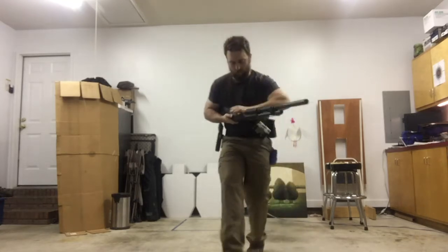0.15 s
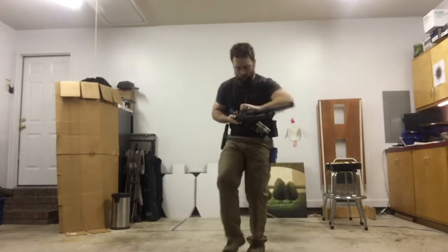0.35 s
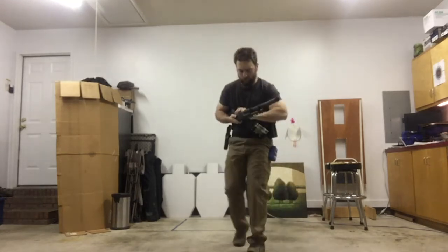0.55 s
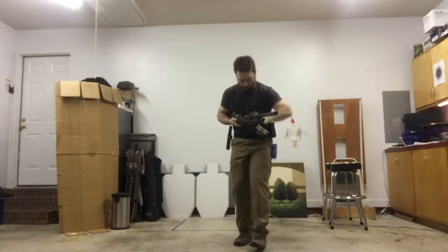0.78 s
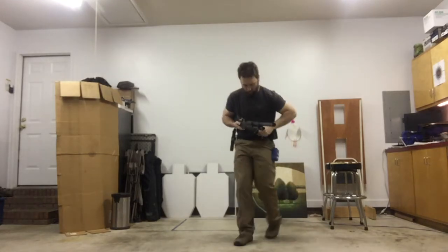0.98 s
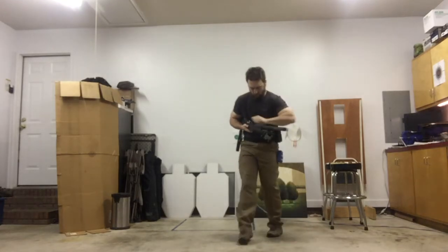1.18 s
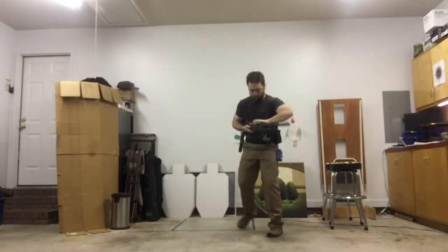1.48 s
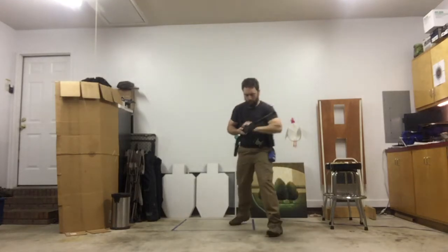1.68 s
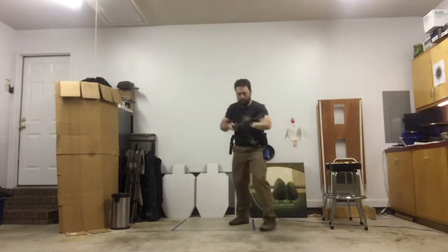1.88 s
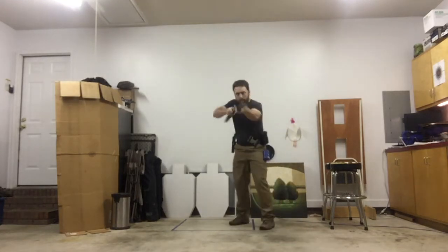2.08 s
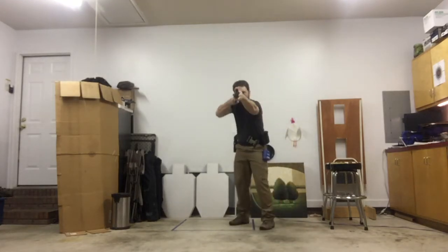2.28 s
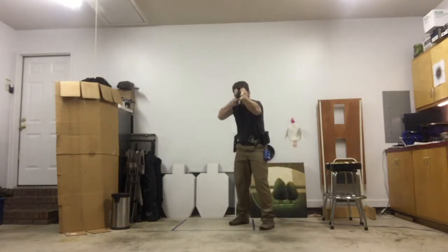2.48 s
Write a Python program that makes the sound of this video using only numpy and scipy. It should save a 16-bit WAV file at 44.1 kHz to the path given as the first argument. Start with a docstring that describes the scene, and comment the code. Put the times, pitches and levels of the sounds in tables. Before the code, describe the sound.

Distant shotgun loading: clacking metal, scraping shells and soft footsteps in a hard-walled garage

```python
"""Shells are thumbed into a shotgun by a man stepping about a hard-walled garage, who then shoulders it.
Each push is a run of steel clicks (noise bursts and faint ringing modes) over scraping hulls (random slips).
Small parts squeak; cloth rustles and soft low thuds of steps and gun lie beneath, over steady room tone.
The microphone stands at a distance and hears mostly the room: weak direct sound, first echoes, dense tails.
Both channels carry the same mono sound."""
import sys
import numpy as np
from scipy import signal
from scipy.fft import rfft, irfft
from scipy.io import wavfile

SR = 44100
rng = np.random.default_rng(int(sys.argv[2]) if len(sys.argv) > 2 else 0)


def int16_out(signal):
    """Quantize to a 16-bit WAV file."""
    q = np.round(np.clip(np.atleast_2d(signal).T, -1, 1) * 32767)
    wavfile.write(sys.argv[1], SR, q.astype(np.int16))


N = 116865

# Shells, latch and gear knocking. Levels are before the room; body and treble are shelf gains:
# (time [s], level [dB], body [dB], treble [dB], direct sound relative to the room send [dB])
CLICKS = [ (0.170, -39.5, -26, -8, 1), (0.196, -42.5, 0, -11, 6), (0.244, -39.5, 16, 0.5, 0.5),
          (0.295, -27.5, -18, -4.5, -5), (0.319, -25, -5.5, -16, 10.5), (0.361, -32, -4.5, -9, 8.5),
          (0.500, -45.5, 9, 10, 7), (0.513, -37, 3, -24, 6), (0.613, -46.5, 16, 3, -2),
          (0.694, -29, 6, 2, -5), (0.707, -31, 2, 2, 0.5), (0.737, -35, -4, 9, 2.5),
          (0.744, -35.5, 2.5, -2.5, 8.5), (0.788, -34, 3, -9, 6), (1.127, -52, -9, -7, 9),
          (1.154, -52, -39, 4, 12.5), (1.162, -51.5, 17, -6, 4), (1.311, -62, -2, 0, 10),
          (1.394, -64, -8, 7, 3), (1.4, -46.5, -33, 0, 4), (1.409, -43, 15, 2.5, -4),
          (1.455, -32, -0.5, -15, 9.5), (1.463, -30.5, -9, -19, 5), (1.509, -32.5, -2.5, 2.5, 4.5),
          (1.516, -31, 0, -7, 10), (1.776, -39, 11.5, 6, 1.5), (1.783, -46.5, 11, 13.5, 10.5),
          (1.849, -37, 7.5, 6, 6.5), (1.867, -32, 3, -10, 6), (1.921, -29.5, -3.5, -6.5, 1),
          (2.164, -53, 10, -23, 16), (2.171, -40.5, 12, -8.5, -2), (2.355, -64, 14, -30, 25),
          (2.367, -41.5, -3, -12.5, 1)]
# Hulls and hands sliding on the gun: (time [s], length [s], level [dB], body [dB], treble [dB])
SLIDES = [ (0.0, 0.0089, -41, 11, 3), (0.250, 0.049, -49.5, 0, 9.5), (0.305, 0.0618, -30.5, 1, 3),
          (0.37, .04, -47.5, 25.5, -15), (0.49, 0.077, -39.5, 3.5, -23), (0.61, 0.077, -46, 2, -0.5),
          (0.707, 0.082, -30, 2.5, -17.5), (0.80, 0.061, -53, 19.5, -15), (1.06, 0.085, -55, 13.5, -3),
          (1.442, 0.044, -30, 3, -1), (1.50, 0.11, -37.5, 7.5, 0), (1.66, .07, -57, 6, -14),
          (1.775, 0.019, -32, 2.5, -14), (1.852, .11, -36, 3.5, 5.5), (1.96, 0.087, -37.5, 6.5, -23),
          (2.175, 0.023, -48.5, -10, -5)]
# Small parts that sing briefly when rubbed or flicked:
# (time [s], length [s], pitch [Hz], width [Hz], level [dB])
SQUEAKS = [(0.0, 0.0067, 4450, 716, -37), (0.169, 0.0027, 3480, 900, -37), (0.188, .012, 1540, 380, -41),
           (0.242, 0.0046, 3520, 890, -30), (0.249, 0.011, 1450, 220, -42),
           (0.293, 0.015, 1770, 447, -34.5), (0.455, 0.036, 838, 256, -48),
           (0.693, 0.038, 1700, 400, -46.5), (0.72, 0.065, 7230, 497, -41),
           (1.127, 0.0039, 4700, 595, -42.5), (1.16, 0.034, 4630, 800, -54), (1.335, 0.029, 795, 300, -55),
           (1.453, 0.028, 2010, 250, -39), (1.512, 0.0075, 4000, 2600, -30.5),
           (1.912, 0.0095, 3160, 1990, -27), (2.161, .012, 1890, 410, -39),
           (2.161, 0.014, 3540, 1090, -38.5), (2.353, 0.028, 1947, 120, -45)]
# Clothing and sling: (time [s], length [s], level [dB])
RUSTLES = [(0.02, 0.13, -60), (0.14, .05, -51), (1.315, 0.037, -50), (1.41, .03, -46.5), (1.67, 0.079, -52),
           (1.97, 0.037, -41.5), (2.18, 0.044, -45.5), (2.346, 0.032, -44.5), (2.39, 0.13, -57.5)]
# Footfalls and dull bumps of the gun: (time [s], level [dB], centre pitch [Hz])
THUDS = [(0.123, -52, 320), (0.145, -61, 150), (0.27, -63, 330), (0.33, -58.5, 320), (0.395, -59, 185),
         (0.617, -59, 250), (0.80, -59.5, 160), (1.065, -66.5, 290), (1.17, -67.5, 280),
         (1.311, -53.5, 1600), (1.411, -60, 384), (1.47, -59.5, 330), (1.555, -54.5, 280), (1.706, -68, 75),
         (1.786, -54, 380), (1.971, -53.5, 337), (2.0, -55, 274), (2.345, -53, 700), (2.354, -44, 1440)]
# Colour of sound passing through the gun's body: (frequency [Hz], relative level [dB])
GUN_COLOUR = [(90, -63), (200, -30.5), (340, -17.5), (460, -24), (620, -18.5), (960, -13.5), (1400, -9),
              (1900, -2.5), (2700, -1.5), (3150, 1), (3900, .5), (4650, 2.5), (5300, -1), (5900, -6.5),
              (7300, -5), (8300, -6), (9500, -5.5), (10400, -11.5), (14000, -11.5), (16000, -18)]
# Modes of barrel and magazine tube: (frequency [Hz], relative level [dB], time to fall 60 dB [s])
STEEL_MODES = [(1550, -30, .3), (1793, -5, .25), (2700, -8.5, .2), (3090, 43, 0.1), (3195, -18, .3),
               (3250, -16, .25), (3720, -15, .25), (4240, -8, .25), (4840, 0, 0.48), (4662, 7, .25),
               (4940, 9, .2)]
# Colour of rubbed cloth: (frequency [Hz], relative level [dB])
CLOTH_COLOUR = [(100, -28.5), (300, -12.5), (800, 0.5), (1500, 0), (2600, 0), (4500, -1.5), (6500, -16.5),
                (9000, -11), (15000, -34)]
# First echoes off floor, ceiling and walls: (delay [s], level relative to the direct sound [dB])
ECHOES = [(.0052, -7.5), (.0085, -8), (0.0124, -10.5), (0.017, -22.5)]
# Decay of the garage: (frequency [Hz], time to fall 60 dB [s])
GARAGE_DECAY = [(100, 0.26), (250, 0.96), (530, 0.52), (1400, 0.7), (4200, 0.64), (7000, .6), (9500, 0.48),
                (11500, 0.43), (15000, 0.42)]
# Colour of the room tone: (frequency [Hz], relative level [dB])
AIR_COLOUR = [(20, -33), (32, -25), (44, -23), (60, 5), (80, -1), (115, -24), (280, -9.5), (600, -16.5),
              (2000, -9), (8000, -21), (16000, -45)]

# Clicks: decay time constants of contact and chatter, chatter and ring relative to their partners
CONTACT_S, CHATTER_S, CHATTER_DB, RING_DB = 0.0021, 0.0072, -7.5, -18
BLOW_S = 0.038  # nominal length that sets the energy of clicks and thuds
BODY_HZ, TREBLE_HZ = 1670, 5700  # where each shelf reaches half its dB
RIPPLE_DB = 12  # limits how far spectral dips are filled
# Friction: slip rate and size spread, smooth rub relative to slips, edge time, clump depth and spacing
SLIPS_PER_S, SLIP_SPREAD_DB, RUB_DB = 650, 4, -4.5
EDGE_S, CLUMP_DB, CLUMP_S = 0.0045, 4, 0.007
THUD_DECAY_S, THUD_OCTAVES = 0.0058, 0.64
# Direct sound of thuds and rubs relative to their room sends, then the distance cut for all direct sound
THUD_DIRECT_DB, RUB_DIRECT_DB, DISTANCE_DB = 6.5, 6, -10.5
TAIL_BUILD_S = 0.003
AIR_DB = -74  # RMS before the microphone's low cut
LOW_CUT_HZ, HIGH_CUT_HZ = 42, 15900
FADE_START_S, FADE_DB_PER_S = 2.51, 47

T = np.arange(16384) / SR  # time within one event [s]
HZ = np.fft.rfftfreq(len(T), 1 / SR)


def click(level_db, body_db, treble_db):
    """A hard contact, a few milliseconds of chatter and a faint ring of steel."""
    envelope = np.exp(-T / CONTACT_S) + amp(CHATTER_DB) * np.exp(-T / CHATTER_S)
    contact = evened(rng.standard_normal(len(T)) * envelope)
    ring = np.zeros(len(T))
    for hz, db, t60 in STEEL_MODES:
        strength = rng.standard_normal()  # each blow excites the modes differently
        ring += strength * amp(db - 60 * T / t60) * np.sin(2 * np.pi * hz * T)
    through_gun = unit(colour(contact, read(GUN_COLOUR, HZ)))
    both = through_gun + amp(RING_DB) * unit(ring)
    return amp(level_db) * colour(sized(both, BLOW_S), tone(body_db, treble_db))


def slide(length, level_db, body_db, treble_db):
    """Friction heard through the body of the gun."""
    through_gun = colour(friction(length), read(GUN_COLOUR, HZ))
    return amp(level_db) * colour(sized(through_gun, length), tone(body_db, treble_db))


def squeak(length, hz, width, level_db):
    """Friction that drives one resonance; its width lies between the -6 dB points."""
    peak = -20 * np.log10(1 + (2 * (HZ - hz) / width) ** 2)
    return amp(level_db) * sized(colour(friction(length), peak), length)


def rustle(length, level_db):
    """Friction of cloth."""
    return amp(level_db) * sized(colour(friction(length), read(CLOTH_COLOUR, HZ)), length)


def friction(length):
    """Tiny slips of uneven size over a smooth rub, catching and freeing in clumps."""
    size_db = SLIP_SPREAD_DB * np.minimum(rng.exponential(1, len(T)), 3)
    direction = rng.choice([-1, 1], len(T))
    slips = amp(size_db) * direction * (rng.random(len(T)) < SLIPS_PER_S / SR)
    rub = amp(RUB_DB) * rng.standard_normal(len(T))
    grip_db = np.interp(T / CLUMP_S, np.arange(len(T)), rng.uniform(-CLUMP_DB, CLUMP_DB, len(T)))
    return (unit(slips) + rub) * amp(grip_db) * stroke(length)


def stroke(length):
    """Attack and hold of a sliding movement, released after its length."""
    attack = np.clip(T / EDGE_S, 0, 1)
    release = np.clip((length - T) / EDGE_S + 1, 0, 1)
    return attack * release


def thud(level_db, hz):
    """A soft blow without a ring: a short noise burst under one broad spectral hump."""
    spread = (np.log2((HZ + 1) / hz) / THUD_OCTAVES) ** 2
    far_above = (HZ / hz / 4) ** 4
    far_below = (hz / (HZ + 1) / 4) ** 2
    hump = -20 * np.log10(1 + spread + far_above + far_below)
    blow = evened(rng.standard_normal(len(T)) * np.exp(-T / THUD_DECAY_S))
    return amp(level_db) * sized(colour(blow, hump), BLOW_S)


def garage(direct, shares):
    """Direct sound, first echoes, and an independent dense tail for each share of the events."""
    near = direct.copy()
    for delay, db in ECHOES:
        add(near, delay, amp(db) * direct)
    tails = sum(signal.fftconvolve(share, tail())[:N] for share in shares)
    return amp(DISTANCE_DB) * near + tails


def tail():
    """Dense reflections that build quickly and die band by band."""
    hz, t, bands = signal.stft(rng.standard_normal(SR), SR, nperseg=256)
    decay = amp(-60 * t / read(GARAGE_DECAY, hz)[:, None])
    x = signal.istft(bands * decay, SR, nperseg=256)[1]
    x = x * (1 - np.exp(-np.arange(len(x)) / SR / TAIL_BUILD_S))
    return x / np.linalg.norm(x)


def air():
    """Low, steady room tone: noise with a fixed spectrum."""
    gain = amp(read(AIR_COLOUR, np.fft.rfftfreq(N, 1 / SR)))
    return amp(AIR_DB) * unit(irfft(rfft(rng.standard_normal(N)) * gain, N))


def amp(db):
    """Decibels to an amplitude factor."""
    return 10 ** (np.asarray(db) / 20)


def unit(x):
    """Scales x to an RMS of one."""
    return x / np.sqrt(np.mean(x ** 2) + 1e-20)


def sized(x, seconds):
    """Scales x to the energy of a unit-RMS sound of that length."""
    return unit(x) * np.sqrt(seconds / T[-1])


def read(points, hz):
    """Reads a table's curve along a logarithmic frequency axis."""
    f, value = np.transpose(points)
    return np.interp(np.log(hz + 1), np.log(f + 1), value)


def colour(x, db):
    """Causal (minimum-phase) filter with the given gain at each frequency."""
    both_sides = np.r_[db, db[-2:0:-1]]
    phase = -signal.hilbert(np.log(amp(both_sides) + 1e-6)).imag[:len(db)]
    return irfft(rfft(x) * amp(db) * np.exp(1j * phase))


def tone(body_db, treble_db):
    """Two shelves: how dull or bright one contact is."""
    body = body_db / (1 + (HZ / BODY_HZ) ** 4)
    treble = treble_db / (1 + (TREBLE_HZ / (HZ + 1)) ** 4)
    return body + treble


def evened(x):
    """Levels the peaks and dips in a burst's spectrum, so that later filters set its colour."""
    size = unit(abs(rfft(x)))
    return colour(x, -20 * np.log10(size + amp(-RIPPLE_DB)))


def add(mix, s, sound):
    """Adds a sound to the mix at a time in seconds, cut at the end of the mix."""
    part = mix[max(round(s * SR), 0):][:len(sound)]
    part += sound[:len(part)]


def scene(count=7):
    """All handling noises and steps in one room; several tails, shared out in turn, smooth its sound."""
    events = [(s, click(db, body, treble), near) for s, db, body, treble, near in CLICKS]
    for table, source in (SLIDES, slide), (SQUEAKS, squeak), (RUSTLES, rustle):
        events += [(s, source(*row), RUB_DIRECT_DB) for s, *row in table]
    events += [(s, thud(*row), THUD_DIRECT_DB) for s, *row in THUDS]
    direct, shares = np.zeros(N), np.zeros((count, N))
    for k, (s, sound, near_db) in enumerate(events):
        add(direct, s, amp(near_db) * sound)
        add(shares[k % count], s, sound)
    return np.tile(garage(direct, shares) + air(), (2, 1))


def record(dry):
    """The microphone sheds the deepest bass and the sound fades at the end; then the band limit."""
    low_cut = signal.butter(4, LOW_CUT_HZ, "highpass", fs=SR, output="sos")
    heard = signal.sosfilt(low_cut, dry)
    fade = amp(-FADE_DB_PER_S * np.maximum(np.arange(N) / SR - FADE_START_S, 0))
    lowpass = signal.firwin(511, HIGH_CUT_HZ, window=("kaiser", 9), fs=SR)
    return signal.oaconvolve(heard * fade, lowpass[None], "same")


dry = scene()
out = record(dry)
int16_out(out)
```